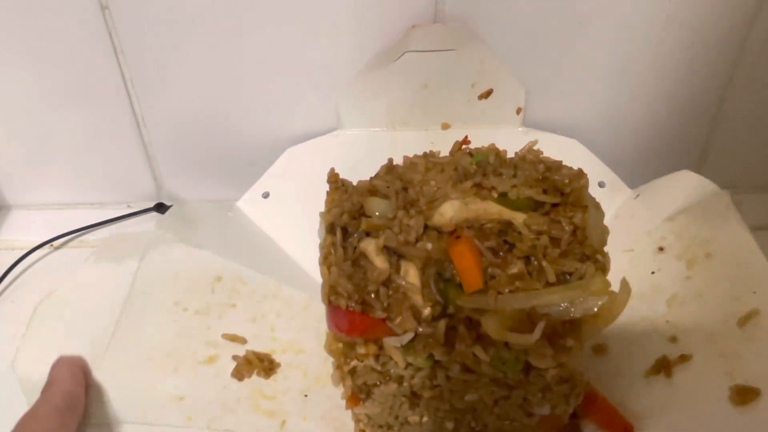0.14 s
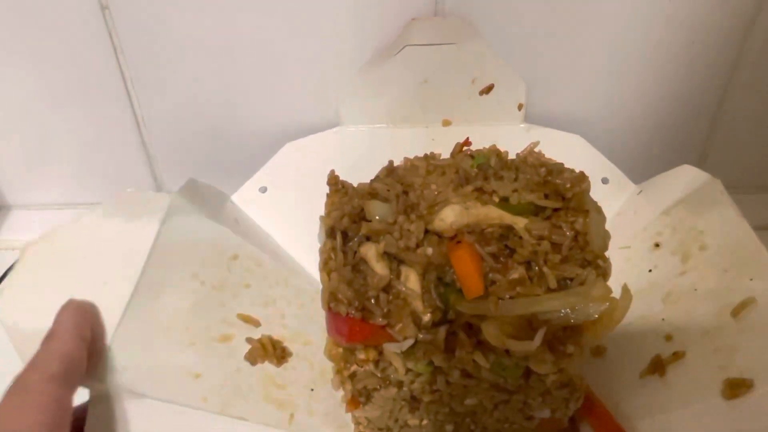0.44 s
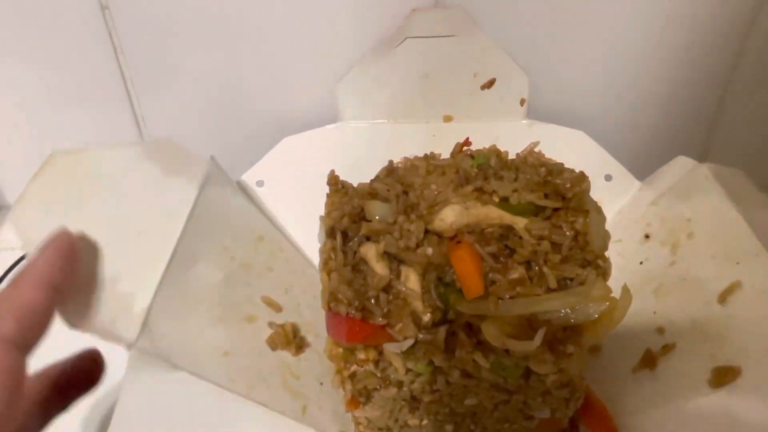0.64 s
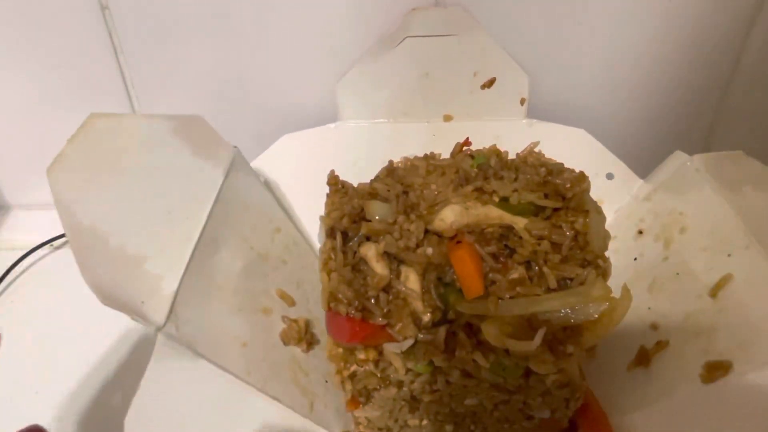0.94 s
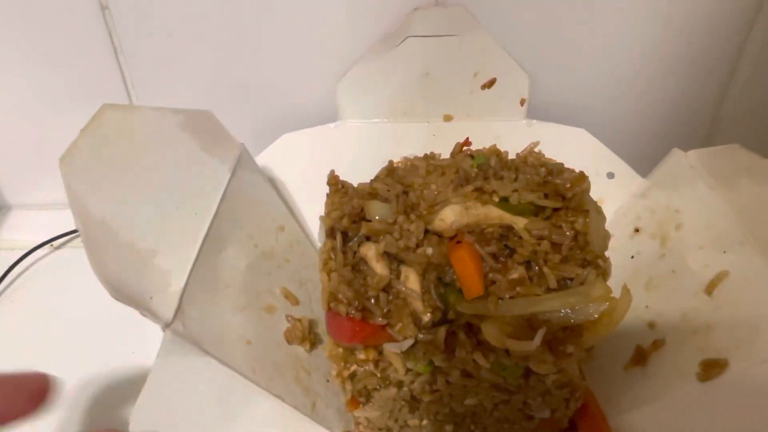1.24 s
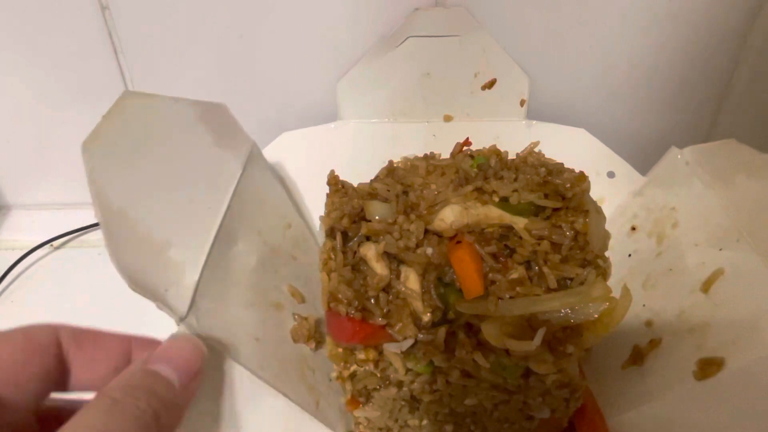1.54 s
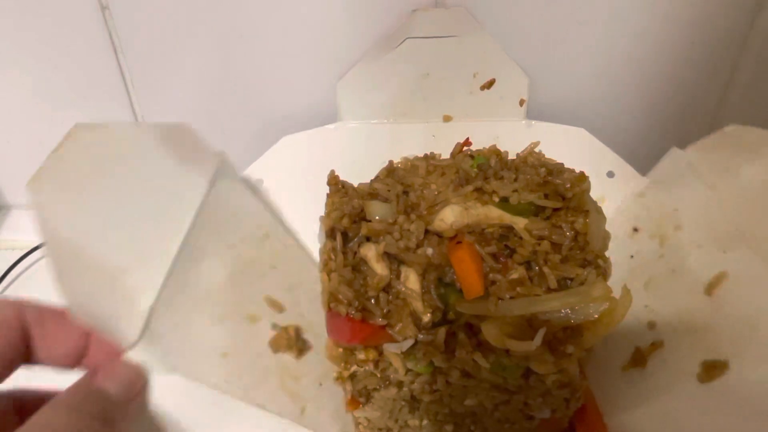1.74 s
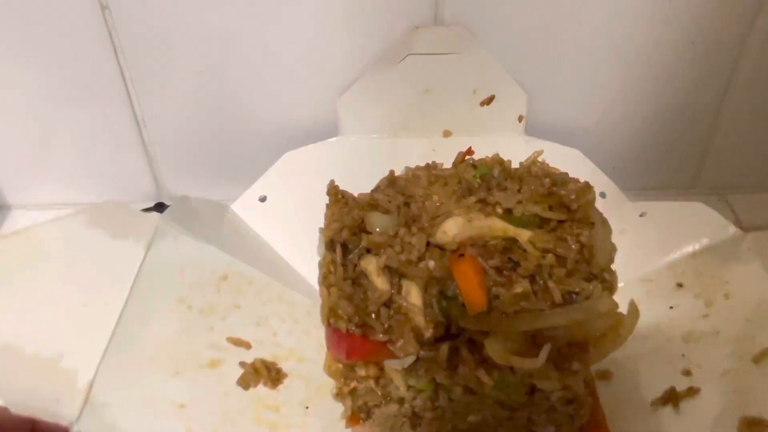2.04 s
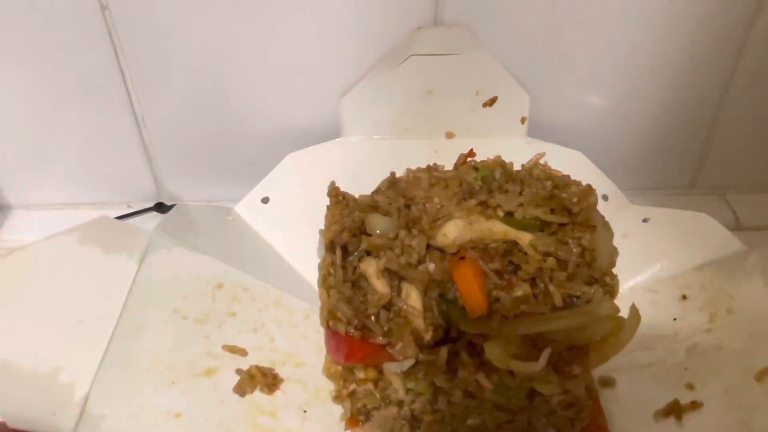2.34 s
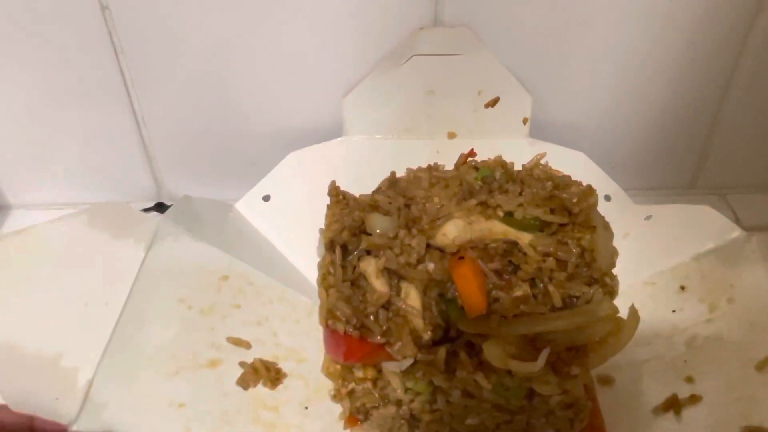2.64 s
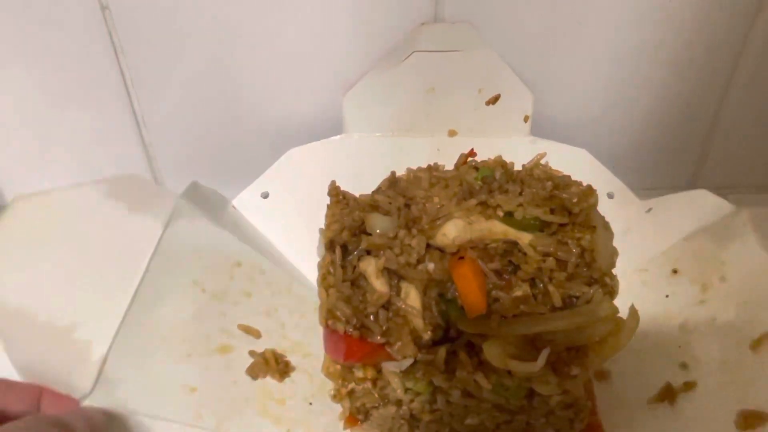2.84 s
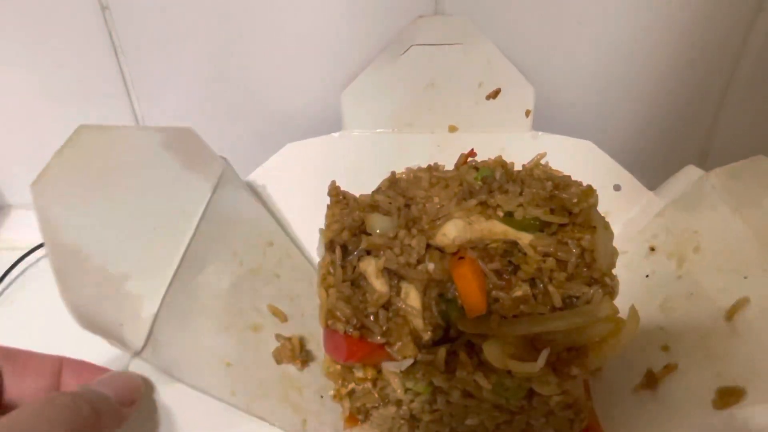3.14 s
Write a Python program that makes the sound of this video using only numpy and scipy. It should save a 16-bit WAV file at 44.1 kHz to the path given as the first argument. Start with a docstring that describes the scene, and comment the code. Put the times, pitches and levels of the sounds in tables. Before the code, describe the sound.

Paperboard carton flap handled close to the microphone: faint rubbing first, a hollow pop and short skid, then scraping with a run of snaps, the sharpest near two seconds, in a small humming room.

```python
"""Paperboard food carton, close up

Indoors, microphone close: a hand lifts, rubs and presses the flap of an open paperboard food carton.
The board pops and thumps as decaying tones; its rubs and scrapes are shaped noise, clicks and glides.
Harder pops ring something hard beneath, probably a plate, as a set of damped modes.
Nearby walls answer with a short noise tail; an appliance hums over low room noise."""
import sys
import numpy as np
from scipy import signal
from scipy.fft import rfft, irfft, next_fast_len
from scipy.io import wavfile
from scipy.ndimage import uniform_filter1d, map_coordinates

SR = 44100
rng = np.random.default_rng(int(sys.argv[2]) if len(sys.argv) > 2 else 0)


def inscribe(sig):
    """Save sig as 16-bit PCM at rate SR to the path in sys.argv[1].

    A 1-D sig is mono; a 2-D sig holds one channel per row.
    Samples are clipped to [-1, 1] before scaling.
    """
    pcm = np.round(np.clip(np.atleast_2d(sig).T, -1, 1) * 32767)
    wavfile.write(sys.argv[1], SR, pcm.astype(np.int16))


N = 145089

# hum lines of the appliance: [f/Hz, level/dB, waver relative to the steady tone]
HUM_LINES = [(100.2, -56, 0.41), (161.55, -56, 0.25), (197.3, -54, 0.18), (245, -71.5, 0.89),
             (324, -71.5, 0.12), (393, -75.5, 0.42), (3323, -85.5, .2)]
# spectrum of the room noise: [f/Hz, relative level/dB]
AIR_COLOUR = [(20, -36), (42, -8), (70, -9), (90, -2.5), (115, -5.5), (140, 0), (185, -6.5), (220, -12),
              (290, -9.5), (370, -17.5), (500, -18), (700, -36), (1200, -40.5), (2700, -52), (3380, -41),
              (3900, -49.5), (5500, -50.5), (13000, -84.5), (15500, -86)]
# left-right likeness of the room noise: [f/Hz, correlation]
AIR_LIKENESS = [(60, 0.89), (170, 0.79), (300, -0.084), (640, 0.16), (1400, -0.59), (3300, 0.026),
                (8200, -0.89), (12000, .2)]
AIR_DB = -52  # rms
# decay of the wall reflections: [f/Hz, t60/s]
WALL_DECAY = [(200, 0.38), (2000, 0.21), (6000, 0.12), (14000, 0.028)]
WET_DB = -15.5  # gain of the wall tail

# knocks on the plate: [t/s, level/dB]
PLATE_KNOCKS = [(1.818, -56), (1.884, -62), (1.9155, -55), (1.981, -40)]
# modes of the plate: [f/Hz, relative level/dB, t60/s]
PLATE_MODES = [(1370, -1, .06), (1500, -1, .035), (1724, -7, .1), (1945, 0, .05), (2403, -8, .11),
               (3083, -5, .085), (4420, -4, .035), (4803, 1, .1), (5740, 1.5, .075), (6250, -4, .04),
               (6762, 2.5, .06), (9033, -9, .06)]
PLATE_CHATTER, CHATTER_PER_S = .25, 220  # depth relative to the tone; random knots per second
PORT_LAG_S = .000042  # the left microphone port hears the plate first

# finger sliding on the board: [t/s, level/dB]
SLIDE_LEVEL = [(0, -77), (.19, -77.5), (.25, -68), (.3, -85), (1.35, -82), (1.41, -65), (1.6, -62.5),
               (1.7, -60), (1.82, -61), (1.87, -67), (1.96, -71.5), (2.03, -63), (2.11, -55), (2.15, -71),
               (2.21, -65.5), (2.28, -66), (2.4, -83.5), (2.68, -83.5), (2.83, -76), (2.94, -74.5),
               (3.0, -88), (3.09, -84), (3.13, -71), (3.19, -86)]
# spectrum of the slide: [f/Hz, relative level/dB]
SLIDE_SPECTRUM = [(250, -7.5), (700, -11), (950, -4.5), (1300, 6.5), (1550, -8), (1780, 4), (1970, 7.5),
                  (2250, -4), (3500, -2), (5500, -5), (7000, -9.5), (10000, -12.5), (13000, -12),
                  (15500, -45)]
# left-right likeness of rubs and ticks, held within -1 to 1 in use: [f/Hz, correlation]
BOARD_LIKENESS = [(300, 0.42), (2000, 0.06), (5000, -0.03), (7000, 0.34), (8200, -2.5), (9800, 1.03),
                  (15000, 0.05)]
# dull rubbing of the flap as it bends: [t/s, level/dB]
BEND_LEVEL = [(0, -68.5), (.18, -72.5), (.25, -60.5), (.3, -73.5), (.45, -79), (1.3, -77.5), (1.5, -71.5),
              (1.8, -57.5), (2.05, -73), (2.28, -68.5), (2.4, -68), (2.47, -106), (2.72, -71.5),
              (2.78, -75.5), (2.95, -63.5), (3.02, -70.5), (3.29, -83)]
# spectrum of the bending rub: [f/Hz, relative level/dB]
BEND_SPECTRUM = [(150, -22), (450, 2.5), (650, 5.5), (900, -2.5), (1200, -8), (2000, -9.5), (2700, -12),
                 (6000, -27), (15000, -72)]
# light brushing of a fingertip over the flap: [t/s, level/dB]
BRUSH_LEVEL = [(0, -77), (.12, -70.5), (.19, -71), (.225, -69.5), (.255, -69.5), (.29, -85), (.44, -94),
               (2.7, -88.5), (2.78, -77), (3.0, -90.5), (3.09, -78), (3.14, -82), (3.2, -90.5)]
# spectrum of the brushing: [f/Hz, relative level/dB]
BRUSH_SPECTRUM = [(300, -11.5), (1000, -13.5), (1350, -2), (1600, 3), (1950, 4), (2250, -14.5),
                  (2500, -1.5), (3000, -12), (4500, -19), (7000, -21), (15000, -41.5)]
# the fold rubbing as the flap swings upright: [t/s, level/dB]
FOLD_LEVEL = [(.72, -90), (.86, -68), (.98, -67.5), (1.04, -67), (1.12, -99)]
# spectrum of the fold: [f/Hz, relative level/dB]
FOLD_SPECTRUM = [(250, -17.5), (500, 5), (720, -0.5), (830, 5.5), (930, -2), (1020, -6), (1130, -14),
                 (1400, -11), (2000, -20), (3000, -14.5), (12000, -47.5)]
# the fingertip skidding on to the flap's edge: [t/s, level/dB]
SKID_LEVEL = [(1.352, -90), (1.363, -51), (1.369, -44), (1.378, -34.5), (1.382, -54), (1.395, -71),
              (1.42, -90)]
# spectrum of the skid: [f/Hz, relative level/dB]
SKID_SPECTRUM = [(200, -17), (400, 1.5), (490, 8.5), (600, 0), (800, -4), (1080, 1.5), (1190, -4.5),
                 (1310, 2), (1500, -9.5), (1850, 4.5), (2020, 6), (2400, -16.5), (3120, -1), (4200, -11),
                 (6500, -14.5), (7500, -22.5), (12000, -23), (15500, -33)]
GRAINS_PER_S, GRAIN_SPREAD_DB = 1500, 1.5
GRAIN_SHARE = .45  # share of the friction's power, the rest is hiss
FRICTION_WAVER_DB, SHIFT_DB = 1.38, 1.8  # of the whole rub; of each band on its own

CRACKLES_PER_S, CRACKLE_SPREAD_DB = 450, 3.5
CRACKLE_DB = -9.5  # relative to the slide's level curve
CRACKLE_HZ, CRACKLE_CYCLES = 3920, 4  # middle pitch; cycles in one t60

# light swipes of the finger: [t/s, length/s, start f/Hz, end f/Hz, level/dB]
SWIPE_EVENTS = [(0.202, 0.063, 2520, 2430, -70), (0.21, 0.039, 1800, 1680, -70),
                (0.227, 0.043, 1400, 1248, -67), (.32, 0.091, 1120, 1520, -76),
                (0.904, 0.18, 980, 871, -73.5), (3.102, 0.081, 1930, 2016, -78)]
SWIPE_KNOTS_PER_S = 400  # more knots widen the scrape's band

# thumps of the whole flap, pitch set by how far it is bent: [t/s, f/Hz, level/dB]
THUMP_EVENTS = [(1.2524, 408, -35), (1.3765, 487, -37), (1.431, 446, -54), (1.617, 445, -44),
                (1.8855, 545, -38.5), (2.2682, 602, -47.5), (2.755, 450, -52.5)]
# modes of the flap: [multiple of its pitch, relative level/dB, t60/s]
FLAP_MODES = [(1, 0, .042), (1.2, -7, 0.028), (1.6, -7.5, 0.035), (2.65, -13.5, 0.028)]

# board pops: [t/s, snap level/dB, snap f/Hz, cycles to the snap's peak, relative tick level/dB]
POP_EVENTS = [(.24, -56, 1780, 1.5, -54), (.254, -65, 1390, 1.6, -65), (.886, -78, 2480, 1, -63),
              (1.132, -61, 2880, 2.2, -46.5), (1.2525, -36.5, 1900, 1.93, -50),
              (1.2524, -39, 960, 0.76, -45), (1.3689, -38, 1930, 2.8, -41.5),
              (1.3722, -34.5, 1930, 2.1, -44), (1.3771, -36.5, 2040, 3.3, -40),
              (1.3807, -44, 1290, 1.4, -57), (1.431, -61, 2920, 1.5, -46.5),
              (1.617, -41.5, 1290, 0.41, -53), (1.676, -45.5, 1040, .5, -54), (1.719, -54, 1970, 0.69, -58),
              (1.767, -47.5, 1950, 2.4, -60), (1.783, -47.5, 1900, 1.4, -45),
              (1.8189, -37, 1570, 0.36, -42), (1.885, -32.5, 760, 0.6, -48.5),
              (1.8857, -37.5, 1610, .66, -54), (1.9171, -38.5, 1470, 1.8, -43),
              (1.9821, -22.5, 1620, 1.1, -31), (1.9915, -35.5, 1930, 0.65, -41),
              (2.116, -43.5, 1610, 1.1, -41.5), (2.2682, -41, 745, .5, -57.5),
              (2.691, -65, 1980, 0.84, -59.5), (2.754, -48, 1080, 0.61, -50.5),
              (2.773, -54.5, 1090, 1.2, -60)]
# spectrum of the crisp tick: [f/Hz, relative level/dB]
TICK_SPECTRUM = [(400, -16), (1500, -10), (3000, 8), (4000, 1.5), (6500, -5), (9000, -12.5), (13000, -12.5),
                 (15500, -51)]
TICK_T60 = 0.028  # s
RATTLE_DB, RATTLE_T60 = -14, .035  # dB relative to the snap; s

LEFT_DB = 0.5  # direct sound and hum: left raised, right lowered by this
TOP_HZ = 15750  # upper band limit


def amp(db):
    """Decibels to gain."""
    return 10 ** (np.asarray(db) / 20)


def unit(x):
    """Scale to rms 1."""
    return x / np.sqrt(np.mean(x ** 2) + 1e-20)


def along(points, hz):
    """Interpolate (Hz, value) points on a log frequency axis."""
    f, v = np.transpose(points)
    return np.interp(np.log(hz + 1), np.log(f + 1), v)


def level(points):
    """Gain per sample from (s, dB) points."""
    return amp(np.interp(np.arange(N) / SR, *np.transpose(points)))


def wobble(rate):
    """A smooth random curve with rate knots per second."""
    knots = rng.standard_normal(int(N * rate / SR) + 4)
    return map_coordinates(knots, [np.arange(N) * rate / SR])


def filtered(x, response):
    """Weight the spectrum of x by a response of frequency."""
    n = x.shape[-1]
    m = next_fast_len(n + 4096)
    return irfft(rfft(x, m) * response(np.fft.rfftfreq(m, 1 / SR)), m)[..., :n]


def stereo(pair, colour, alike):
    """Colour two unrelated signals and blend them into left and right at rms 1."""
    def response(hz):
        turn = np.arccos(np.clip(along(alike, hz), -1, 1)) / 2
        return amp(along(colour, hz)) * [np.cos(turn), np.sin(turn)]

    mid, side = filtered(pair, response)
    return unit(np.array([mid + side, mid - side]))


def add(track, s, sound):
    """Mix a sound in at time s."""
    part = track[:, round(s * SR):][:, :sound.shape[-1]]
    part += sound[..., :part.shape[1]]


def ring(t, hz, t60, rise):
    """A damped sine with a short rise."""
    return np.sin(2 * np.pi * hz * t) * amp(-60 * t / t60) * (1 - np.exp(-t / rise))


def room_tone():
    """Wavering hum lines of an appliance over low room noise."""
    t = np.arange(N) / SR
    hum = np.zeros(N)
    for hz, db, waver in HUM_LINES:
        sway = 1 + waver * (wobble(9) + 1j * wobble(10))  # of strength and phase
        tone = np.exp(2j * np.pi * (hz * t + rng.random()))
        hum += amp(db) * unit(np.real(sway * tone))
    air = stereo(rng.standard_normal((2, N)), AIR_COLOUR, AIR_LIKENESS)
    return hum * amp([[LEFT_DB], [-LEFT_DB]]) + amp(AIR_DB) * air


def walls(x):
    """Dense reflections from nearby walls form a short noise tail, the treble dying first."""
    hz, t, z = signal.stft(rng.standard_normal((2, SR // 3)), SR, nperseg=256)
    decay = amp(-60 * t / along(WALL_DECAY, hz)[:, None])
    tail = signal.istft(z * decay, SR, nperseg=256)[1]
    return signal.fftconvolve(x, tail / np.linalg.norm(tail[0]), axes=1)[:, :N]


def plate():
    """Harder pops set the plate's damped modes ringing, roughened by the board resting on it."""
    out, t = np.zeros((2, N)), np.arange(SR // 4) / SR
    lag = PORT_LAG_S / 2 * np.array([[1], [-1]])
    for s, db in PLATE_KNOCKS:
        for hz, mode_db, t60 in PLATE_MODES:
            knots = rng.standard_normal(CHATTER_PER_S)
            chatter = 1 + PLATE_CHATTER * np.interp(t * CHATTER_PER_S, np.arange(CHATTER_PER_S), knots)
            envelope = amp(db + mode_db - 60 * t / t60) * (1 - np.exp(-t / .0005))
            add(out, s, chatter * envelope * np.sin(2 * np.pi * hz * (t + lag)))
    return out


def shifting(pair):
    """The contact point wanders, so each band swells and fades on its own."""
    z = signal.stft(pair, nperseg=256)[2]
    field = rng.standard_normal(z.shape[1:])
    field = uniform_filter1d(field, size=4, axis=0)  # across frequency
    field = uniform_filter1d(field, size=12, axis=1)  # across time
    return signal.istft(z * amp(SHIFT_DB * unit(field)), nperseg=256)[1][:, :N]


def friction(curve, colour):
    """Paper fibres catch and slip: tiny clicks of uneven size over a hiss, coloured by the board."""
    happens = rng.random(N) < GRAINS_PER_S / SR
    size = amp(GRAIN_SPREAD_DB * np.clip(rng.standard_normal(N), -2, 2))
    slips = happens * size * rng.standard_normal((2, N))
    hiss = rng.standard_normal((2, N))
    pair = np.sqrt(GRAIN_SHARE) * unit(slips) + np.sqrt(1 - GRAIN_SHARE) * hiss
    rub = stereo(shifting(pair), colour, BOARD_LIKENESS)
    return level(curve) * amp(FRICTION_WAVER_DB * wobble(45)) * rub


def rubbing():
    """Five contacts with the board share one friction mechanism, each with its own level and colour."""
    slide = friction(SLIDE_LEVEL, SLIDE_SPECTRUM)
    bend = friction(BEND_LEVEL, BEND_SPECTRUM)
    brush = friction(BRUSH_LEVEL, BRUSH_SPECTRUM)
    fold = friction(FOLD_LEVEL, FOLD_SPECTRUM)
    skid = friction(SKID_LEVEL, SKID_SPECTRUM)
    return slide + bend + brush + fold + skid


def crackle():
    """Single fibres give way under the sliding finger, each a damped ring of its own pitch and size."""
    out, t = np.zeros((2, N)), np.arange(SR // 100) / SR
    count = int(CRACKLES_PER_S * N / SR)
    times = rng.random(count) * N / SR
    traits = np.clip(rng.standard_normal((count, 3)), -2, 2)
    for s, (pitch, size, side) in zip(times, traits):
        hz = CRACKLE_HZ * 2 ** (pitch / 2)
        gain = amp(CRACKLE_SPREAD_DB * size + 2 * np.array([[side], [-side]]))
        add(out, s, gain * ring(t, hz, CRACKLE_CYCLES / hz, .0001))
    return amp(CRACKLE_DB) * level(SLIDE_LEVEL) * unit(out)


def swipes():
    """A narrow scraping resonance swells, glides with the finger and fades."""
    out = np.zeros((2, N))
    for s, length, start_hz, end_hz, db in SWIPE_EVENTS:
        n = round(length * SR)
        grit = (wobble(SWIPE_KNOTS_PER_S) + 1j * wobble(SWIPE_KNOTS_PER_S))[:n]
        turns = np.cumsum(np.linspace(start_hz, end_hz, n)) / SR
        scrape = np.real(grit * np.exp(2j * np.pi * turns))
        add(out, s, amp(db) * unit(scrape * np.hanning(n)))
    return out


def thumps():
    """The flap's low modes ring briefly when it buckles."""
    out, t = np.zeros((2, N)), np.arange(SR // 8) / SR
    for s, hz, db in THUMP_EVENTS:
        for multiple, mode_db, t60 in FLAP_MODES:
            add(out, s, amp(db + mode_db) * ring(t, hz * multiple, t60, 0.00089))
    return out


def pops():
    """Each buckle of the board gives a brief snap, a crisp tick and a short rattle."""
    out, t = np.zeros((2, N)), np.arange(SR // 8) / SR
    for s, snap_db, hz, cycles, tick_db in POP_EVENTS:
        noise = rng.standard_normal((2, 2, len(t)))
        u = hz * t / cycles  # reaches 1 at the snap's peak
        snap = (u * np.exp(1 - u)) ** 2 * np.sin(2 * np.pi * hz * t)
        # the rattle's spectrum centres on the snap's pitch
        colour = [(hz / 4, -12), (hz / 2, -5), (hz, 0), (hz * 2, -13), (hz * 10, -45)]
        rattle = stereo(noise[0], colour, [(500, 0.18), (4000, 0.25)])
        rattle = amp(RATTLE_DB - 60 * t / RATTLE_T60) * (1 - np.exp(-u)) * rattle
        tick = 0.45 * stereo(noise[1], TICK_SPECTRUM, BOARD_LIKENESS) * amp(-60 * t / TICK_T60)
        add(out, s, amp(snap_db) * (snap + rattle) + amp(tick_db) * tick)
    return out


def scene():
    """The carton close by, a little to the left, in the humming room."""
    background = room_tone()
    carton = plate() + rubbing() + crackle() + swipes() + thumps() + pops()
    direct = carton * amp([[LEFT_DB], [-LEFT_DB]])
    return background + amp(WET_DB) * walls(carton) + direct


def record(dry):
    """The microphone channel passes nothing at or above the band limit."""
    return filtered(dry, lambda hz: hz < TOP_HZ)


dry = scene()
out = record(dry)
inscribe(out)
```